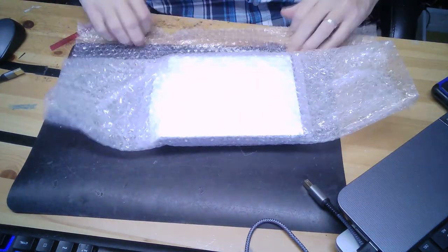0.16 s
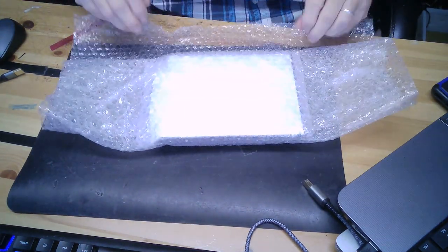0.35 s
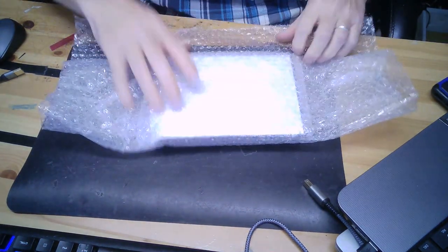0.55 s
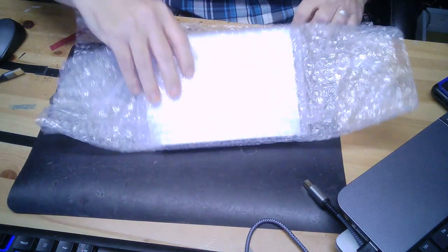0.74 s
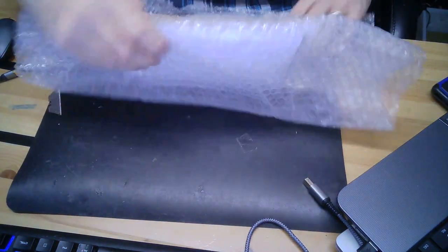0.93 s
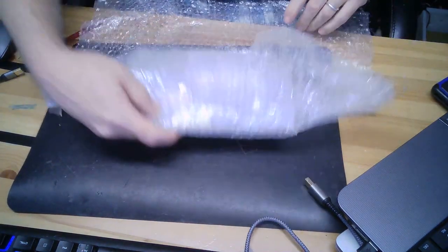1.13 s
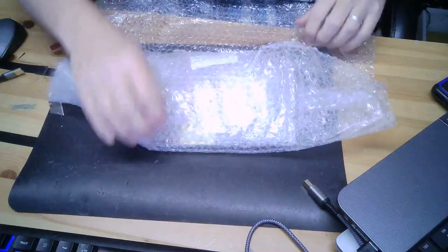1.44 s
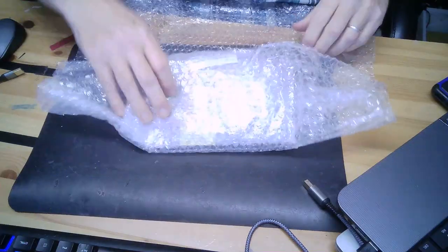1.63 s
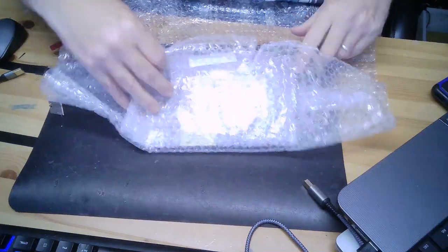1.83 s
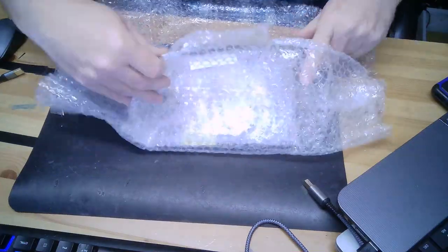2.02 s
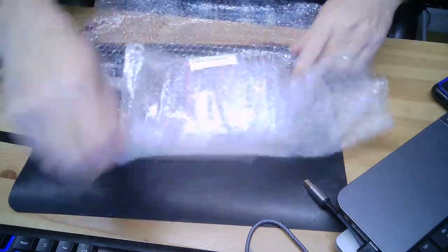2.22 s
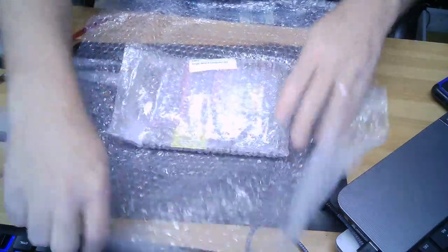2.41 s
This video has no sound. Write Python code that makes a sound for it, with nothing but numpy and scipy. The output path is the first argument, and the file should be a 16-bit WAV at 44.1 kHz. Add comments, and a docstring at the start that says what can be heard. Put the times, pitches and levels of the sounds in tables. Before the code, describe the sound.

Crinkling bubble wrap is unfolded up close, while a flat package bumps against a desk.

```python
"""Hands unfold bubble wrap on a desk, close to a microphone in a small room.
From the start, the film buckles in a stream of tiny clicks over a low rumble and a faint electrical whine.
At 0.24 s the flat package drops, the desk booms and the swinging sheet wafts air at the microphone.
After a short lull the crinkling returns, with snaps as creases flip and knocks from hands and package.
These crowd together near 1.3 s, then come more thinly while the crinkling goes on to the end."""
import sys
import numpy as np
from scipy import signal
from scipy.fft import rfft, irfft
from scipy.io import wavfile
from scipy.ndimage import uniform_filter1d

SR = 44100
rng = np.random.default_rng(int(sys.argv[2]) if len(sys.argv) > 2 else 0)


def master_out(mix):
    """Clip the mix to full scale and print it as 16-bit PCM to the path in sys.argv[1]."""
    frames = np.transpose(np.atleast_2d(mix))
    ceiling = np.clip(frames, -1, 1)
    pcm = np.round(ceiling * 32767).astype(np.int16)
    wavfile.write(sys.argv[1], SR, pcm)


N = 112454

# Tone colours, or how strong each source is from low to high pitch: f/Hz, level/dB
RUMBLE_COLOUR = [(15, 7.5), (28, 8), (50, 1.5), (80, -13), (150, -15.5), (300, -20.5), (1000, -31),
                 (2200, -27.5), (4000, -37.5), (8000, -48)]
AIR_COLOUR = [(12, -8.5), (28, 3.5), (50, -7.5), (85, -9.5), (140, -10), (250, -25), (600, -59)]
SLIDE_COLOUR = [(40, -26), (80, -6), (135, 0.5), (180, -1), (310, -6), (370, 2), (430, -4.5), (540, 1),
                (650, -6), (850, -7.5), (1300, -14), (2500, -25.5)]
SNAP_COLOUR = [(150, -8), (600, -2.5), (1200, 1.5), (2500, -2.5), (4000, -2.5), (6000, 2), (8000, -5)]
TICK_COLOUR = [(400, -19.5), (1200, -6), (2500, -1), (4000, -2.5), (6000, 1.5), (8000, -4)]
FLEX_COLOUR = [(200, -29.5), (600, -8.5), (1100, -7.5), (1900, -1), (2700, -4.5), (3700, -10.5),
               (5000, -12.5), (8000, -15.5)]
CRINKLE_COLOUR = [(500, -29.5), (1500, -17.5), (3000, -6), (4000, -5.5), (5200, 1), (6300, 2), (7300, 5.5),
                  (8500, -24)]
# Puffs of air from the sheet: peak t/s, level/dB, half length/s
AIR_PUFFS = [(0.24, -35, 0.049), (0.662, -31.5, .03), (0.995, -41, 0.082), (1.223, -33, 0.064),
             (1.394, -39, 0.055), (2.321, -37.5, 0.044)]
# Tones at which the desk rings: f/Hz, level/dB, time to fade by 60 dB/s
DESK_TONES = [(30.7, -11.5, .22), (51, -3.5, 0.12), (81, -0.5, 0.31), (133.7, -3, 0.22), (205, -9.5, 0.17),
              (231.7, -4.5, 0.13), (258.6, -5, 0.16), (365, 2, .11), (560, -28.5, 0.077), (800, -10.5, .05)]
# Blows that reach the desk: t/s, level/dB, length of the push/s
DESK_BLOWS = [(0.2423, -14.5, 0.0023), (.638, -30, 0.0044), (0.667, -25, 0.0047), (0.72, -26.5, 0.0075),
              (1.115, -35.5, 0.004), (1.274, -29, 0.0041), (1.289, -23, 0.0048), (1.312, -32, 0.0014),
              (1.685, -34.5, .004), (1.745, -38.5, .003), (2.164, -39.5, .002), (2.226, -41, 0.0034),
              (2.292, -42, 0.0041)]
# Knocks of fingers and package: t/s, level/dB, f/Hz, fade time of the rattle/s
KNOCKS = [(.237, -17, 664, 0.0095), (.565, -34, 600, 0.012), (.634, -30, 800, .009),
          (0.6626, -19, 950, 0.0084), (0.6832, -20.5, 1600, .005), (.731, -24.5, 650, 0.014),
          (.791, -33, 1000, .008), (1.066, -20, 636, 0.017), (1.0725, -30.5, 510, .006),
          (1.184, -31, 1100, .009), (1.265, -11, 910, 0.0081), (1.2754, -14.5, 770, 0.012),
          (1.281, -25, 950, 0.0027), (1.288, -20, 2100, 0.0037), (1.3095, -16, 1150, 0.0066),
          (1.3195, -19, 950, 0.0054), (1.3331, -11.5, 2000, 0.0049), (1.336, -15.5, 1630, 0.0048),
          (1.3824, -26, 1264, 0.0066), (1.741, -29, 1050, 0.0073), (1.875, -29, 530, 0.0088),
          (1.9935, -26, 603, .011), (2.171, -36, 457, 0.013), (2.546, -25.5, 450, .009)]
# Package and hands sliding on the desk: t/s, level/dB
SLIDE_LEVELS = [(0, -41), (.06, -53.5), (.17, -53), (.22, -46.5), (.33, -43), (.38, -58), (.5, -60),
                (.56, -44.5), (.62, -61), (.645, -36), (.76, -41.5), (.9, -43), (1.03, -42.5), (1.15, -45),
                (1.24, -38.5), (1.3, -32.5), (1.37, -43.5), (1.5, -44.5), (1.62, -51), (1.7, -44.5),
                (1.76, -44), (1.87, -46.5), (1.95, -51), (2.01, -40), (2.07, -48), (2.14, -60.5),
                (2.175, -39), (2.22, -45), (2.29, -43), (2.36, -54.5), (2.47, -55), (2.55, -45.5)]
# Louder snaps of the film: t/s, level/dB
SNAPS = [(.2175, -34), (.2245, -30), (.239, -20), (.423, -35.5), (.4757, -41), (.4945, -39), (.639, -39),
         (.6495, -28), (.7135, -31), (.7905, -23), (.8245, -51), (.8295, -31), (.8325, -19.5),
         (.994, -29.5), (1.1135, -42), (1.1955, -24), (1.287, -23), (1.3115, -17.5), (1.3145, -19),
         (1.317, -21), (1.3335, -28), (1.649, -31), (1.688, -28.5), (1.802, -28), (1.819, -35.5),
         (1.889, -33.5), (1.9945, -31.5), (2.2585, -24), (2.2915, -34), (2.489, -20), (2.4915, -21),
         (2.504, -24)]
# Handling of the wrap: t/s, bright crinkling level/dB, duller flexing level/dB
FILM_LEVELS = [(0, -41, -45.5), (.07, -52, -49.5), (.11, -45.5, -50), (.18, -46.5, -45.5),
               (.23, -36.5, -41), (0.269, -46.5, -45.5), (0.339, -47, -54), (.39, -56.5, -61.5),
               (0.461, -69, -69), (.498, -67, -68), (.512, -51.5, -54), (.585, -45.5, -51),
               (.625, -55.5, -53.5), (0.644, -44, -43.5), (.715, -41, -42.5), (.77, -43.5, -44.5),
               (0.959, -41.5, -42.5), (1.071, -45, -48), (1.17, -43.5, -43), (1.24, -39.5, -38.5),
               (1.32, -49, -38), (1.365, -51, -47), (1.42, -47, -43.5), (1.47, -48, -47),
               (1.53, -44.5, -44.5), (1.626, -58.5, -60), (1.696, -39.5, -44), (1.731, -46, -49),
               (1.81, -41.5, -47), (1.872, -45, -47.5), (1.935, -49.5, -52.5), (1.98, -47, -46.5),
               (2.006, -40, -41), (2.051, -44, -47), (2.11, -48, -52.5), (2.19, -47, -49.5),
               (2.239, -46.5, -48), (2.29, -39, -43), (2.329, -46, -47), (2.41, -50.5, -47.5),
               (2.48, -50, -46.5), (2.51, -44, -41), (2.55, -48.5, -47.5)]


def undb(db):
    """Turn decibels into a number to multiply by."""
    return 10 ** (np.asarray(db) / 20)


def unit(x):
    """Scale a sound to an average power of one."""
    return x / np.sqrt(np.mean(x ** 2))


def random_gains(spread_db, limit=2):
    """One random gain per sample, at most limit * spread_db decibels up or down."""
    return undb(spread_db * np.clip(rng.standard_normal(N), -limit, limit))


def curve(rows):
    """Gain over time, joining points of t/s, level/dB."""
    s, db = np.array(rows).T
    return undb(np.interp(np.arange(N) / SR, s, db))


def colour(x, points):
    """Filter a sound through points of f/Hz, level/dB."""
    size = 4096
    hz, db = np.array(points).T
    f = np.maximum(np.arange(size // 2 + 1) * SR / size, 1)
    gain = undb(np.interp(np.log(f), np.log(hz), db))
    # build the filter so that it rings only after a click, never before
    cepstrum = irfft(np.log(gain))
    cepstrum[1:size // 2] *= 2
    cepstrum[size // 2 + 1:] = 0
    response = irfft(np.exp(rfft(cepstrum)))
    return signal.fftconvolve(x, response)[:len(x)]


def band(x, lo_hz, hi_hz):
    """Keep the part of a sound between two frequencies."""
    return signal.sosfilt(signal.butter(2, [lo_hz, hi_hz], "band", fs=SR, output="sos"), x)


def add(out, s, sound):
    """Mix a sound in at s seconds."""
    i = int(s * SR)
    out[i:i + len(sound)] += sound[:max(N - i, 0)]


def background(rumble_db=-42.5, whine_hz=1071, whine_db=-58.5):
    """A low rumble with some hiss, and a thin, steady electrical whine."""
    rumble = unit(colour(rng.standard_normal(N), RUMBLE_COLOUR))
    whine = np.sqrt(2) * np.sin(2 * np.pi * whine_hz * np.arange(N) / SR)
    return undb(rumble_db) * rumble + undb(whine_db) * whine


def room(x, fade_60db_s=0.096, echo_db=-12):
    """Sound bounces off desk and walls, which adds a short blur of echoes."""
    t = np.arange(SR // 2) / SR
    tail = rng.standard_normal(len(t)) * undb(-60 * t / fade_60db_s) * (t > .003)
    tail = band(tail / np.sqrt(np.sum(tail ** 2)), 180, 7200)
    return x + undb(echo_db) * signal.fftconvolve(x, tail)[:N]


def wafts():
    """The swinging sheet pushes air at the microphone in soft, deep swells."""
    t = np.arange(N) / SR
    swell = sum(undb(db) * np.exp(-((t - s) / half_s) ** 2) for s, db, half_s in AIR_PUFFS)
    return swell * unit(colour(rng.standard_normal(N), AIR_COLOUR))


def desk():
    """Soft blows make the desk boom at its own tones."""
    force, t = np.zeros(N), np.arange(SR // 2) / SR
    for s, db, push_s in DESK_BLOWS:
        push = t * np.exp(-4 * t / push_s)
        add(force, s, undb(db) * push / push.sum())
    ring = sum(-undb(db - 60 * t / fade_s) * np.sin(2 * np.pi * hz * t) for hz, db, fade_s in DESK_TONES)
    return signal.fftconvolve(force, ring)[:N]


def package_drop(at_s=.2385, db=-19.5, start_hz=2426, sweep_s=0.00772, rise_s=0.0033):
    """The package lands and bends the desk top. High tones travel faster, so the chirp falls."""
    out, t = np.zeros(N), np.arange(SR // 2) / SR
    cycles = start_hz * t / (1 + t / sweep_s)
    swell = t / rise_s * np.exp(1 - t / rise_s)
    add(out, at_s, undb(db) * swell * np.sin(2 * np.pi * cycles))
    return out


def knocks(ring_cycles=1.14, rattle_db=-14.5):
    """Padded taps: the package rings for a cycle or two and rattles briefly around that pitch."""
    out, t = np.zeros(N), np.arange(SR // 10) / SR
    for s, db, hz, fade_s in KNOCKS:
        ring = -np.sin(2 * np.pi * hz * t) * np.exp(-t * hz / ring_cycles)
        rattle = unit(band(rng.standard_normal(len(t)), hz * 0.43, hz * 1.54)) * np.exp(-t / fade_s)
        add(out, s, undb(db) * (ring + undb(rattle_db) * rattle))
    return out


def clicks(points, per_s, size_spread_db, band_spread_db, ring_s):
    """A stream of tiny random clicks, each with its own tone colour and a very short ring."""
    hits = rng.random(N) < per_s / SR
    sizes = hits * random_gains(size_spread_db)
    t = np.arange(SR // 20) / SR
    fade = np.exp(-2 * t / ring_s)
    edges_hz = np.geomspace(40, 10240, 13)
    out = np.zeros(N)
    for lo, hi in zip(edges_hz[:-1], edges_hz[1:]):
        push = sizes * random_gains(band_spread_db)
        energy = np.abs(signal.fftconvolve(push ** 2, fade)[:N])
        nearby_energy = uniform_filter1d(energy, SR // 40)
        energy /= np.sqrt(nearby_energy * energy.mean() + 1e-12)  # partly even out slow swings
        out += band(np.sqrt(energy) * rng.standard_normal(N), lo, hi)
    return unit(colour(out, points))


def sliding(gain_db=-0.5):
    """Package and hands rub over the desk with a low, grainy scrape."""
    scrape = clicks(SLIDE_COLOUR, per_s=1200, size_spread_db=4, band_spread_db=1, ring_s=.002)
    return undb(gain_db) * scrape * curve(SLIDE_LEVELS)


def snaps(crack_s=0.0007, shiver_s=0.0074, shiver_db=-14.5):
    """A crease flips over: a sharp crack and a short shiver of the film."""
    out, t = np.zeros(N), np.arange(SR // 20) / SR
    for s, db in SNAPS:
        crack, shiver = rng.standard_normal((2, len(t)))
        crack = band(crack, 200, 8000) * np.exp(-t / crack_s)
        crack *= np.sqrt(crack_s * SR / 2 / np.sum(crack ** 2))  # same energy for every draw
        shiver *= undb(shiver_db) * np.exp(-t / shiver_s)
        add(out, s, undb(db) * (crack + shiver))
    return colour(out, SNAP_COLOUR)


def ticks(per_s=100, spread_db=3, fade_s=0.00061):
    """Single bubbles and creases tick out above the crinkling."""
    hits = rng.random(N) < per_s / SR
    sizes = hits * random_gains(spread_db, limit=1.5)
    t = np.arange(SR // 100) / SR
    bursts = signal.fftconvolve(sizes, np.exp(-t / fade_s))[:N]
    return unit(colour(bursts * rng.choice([-1, 1], N), TICK_COLOUR))


def bunching(per_s=51, spread_db=1.5):
    """Creases give way in little bunches, so the level wobbles quickly."""
    width = int(SR / per_s)
    wobble = uniform_filter1d(rng.standard_normal(N), width)
    wobble = unit(uniform_filter1d(wobble, width // 3))
    return undb(spread_db * np.clip(wobble, -2, 2))


def bubble_wrap(crinkle_db=-1, flex_db=0.5, tick_db=-8.5):
    """The film buckles as it unfolds: bright crinkling and ticks over the duller flexing of the sheet."""
    crinkle = clicks(CRINKLE_COLOUR, per_s=3300, size_spread_db=2.5, band_spread_db=0.5, ring_s=0.00066)
    flex = clicks(FLEX_COLOUR, per_s=1500, size_spread_db=0, band_spread_db=1.5, ring_s=0.0012)
    levels = np.array(FILM_LEVELS)
    bright = (undb(crinkle_db) * crinkle + undb(tick_db) * ticks()) * curve(levels[:, [0, 1]])
    dull = undb(flex_db) * flex * curve(levels[:, [0, 2]])
    return bunching() * (bright + dull)


def scene():
    """Wrap and desk sound in the room; moving air and the background join without echoes."""
    handling = bubble_wrap() + sliding() + snaps() + knocks() + package_drop() + desk()
    return (room(handling) + wafts() + background())[None]


def record(dry):
    """The microphone passes nothing above about 8 kHz."""
    treble_cut = signal.firwin(141, 7900, window=("kaiser", 7), fs=SR)
    return signal.fftconvolve(dry, treble_cut[None], mode="same")


dry = scene()
out = record(dry)
master_out(out)
```